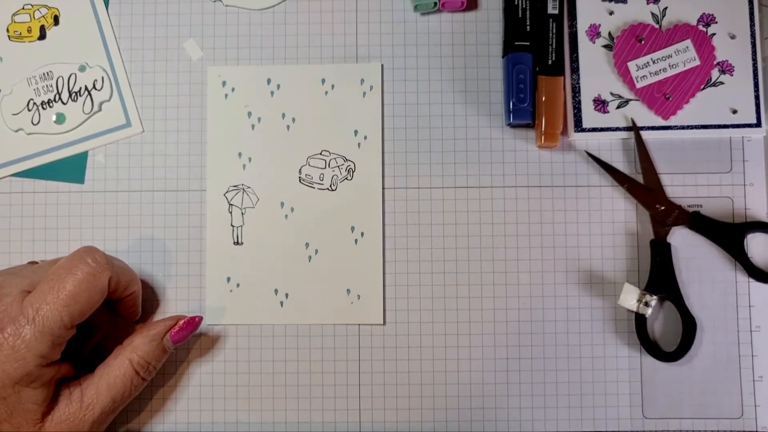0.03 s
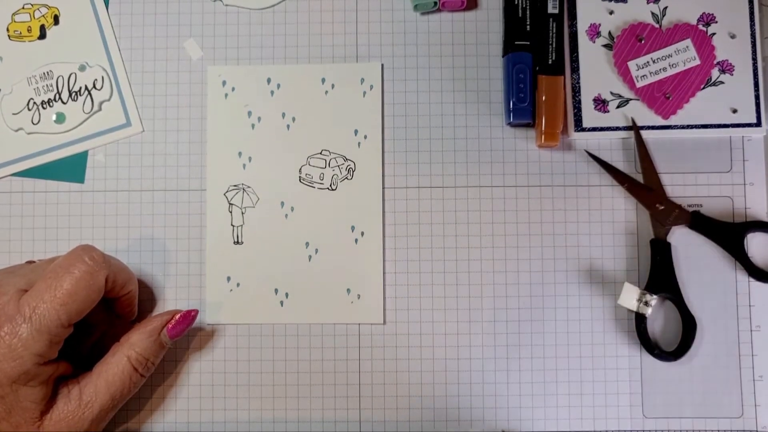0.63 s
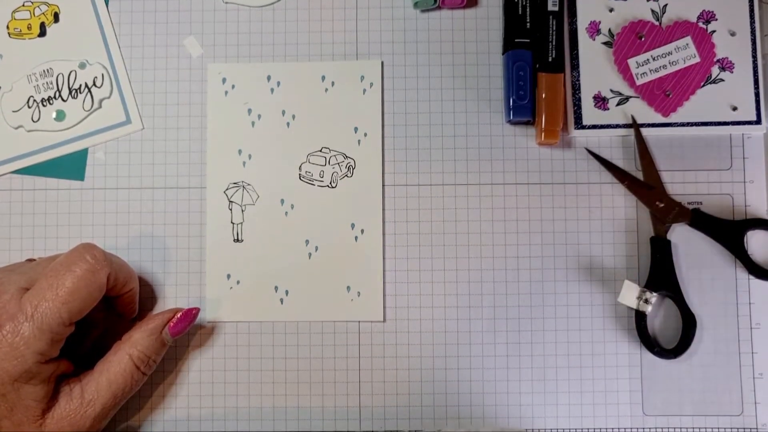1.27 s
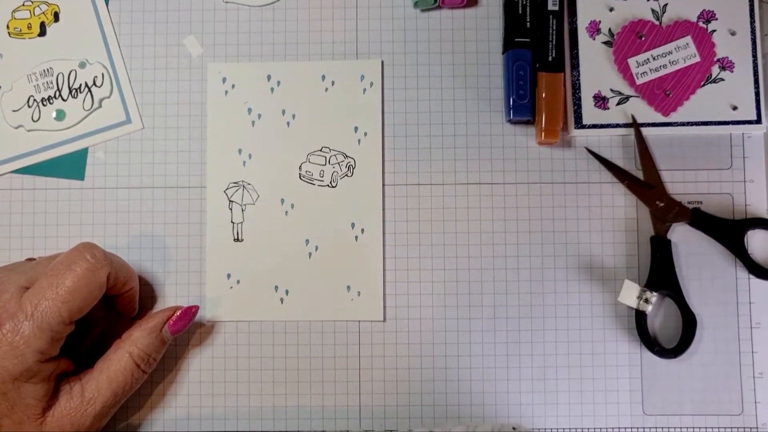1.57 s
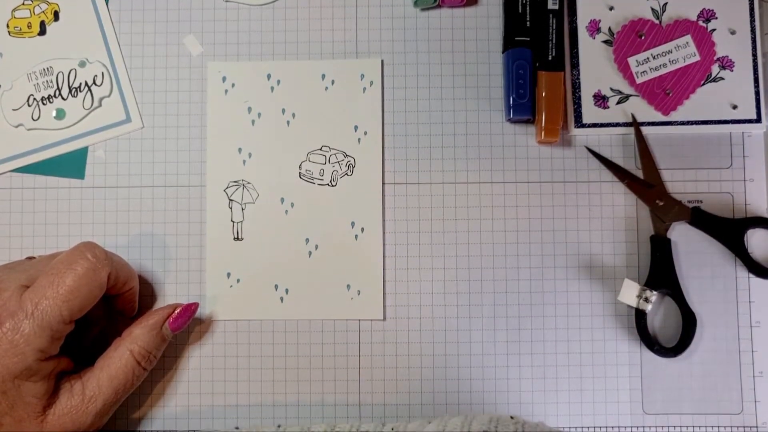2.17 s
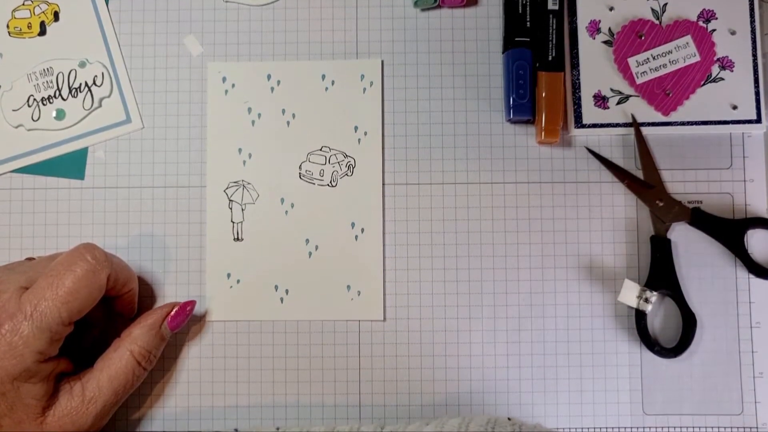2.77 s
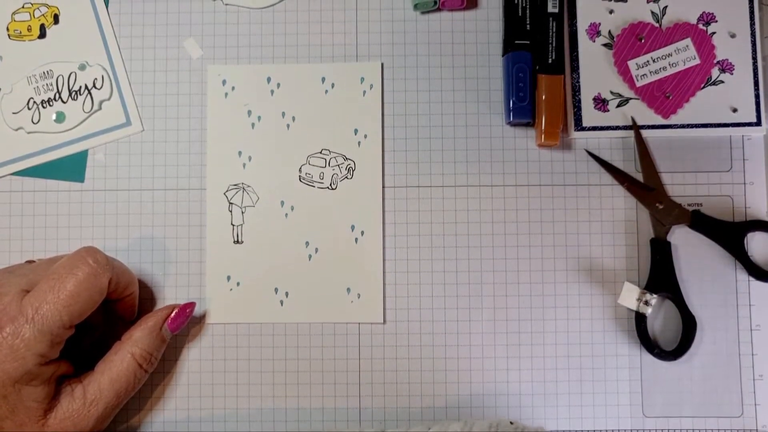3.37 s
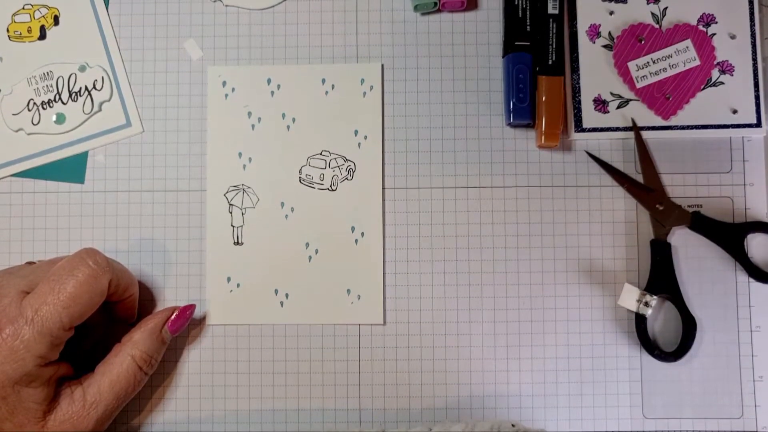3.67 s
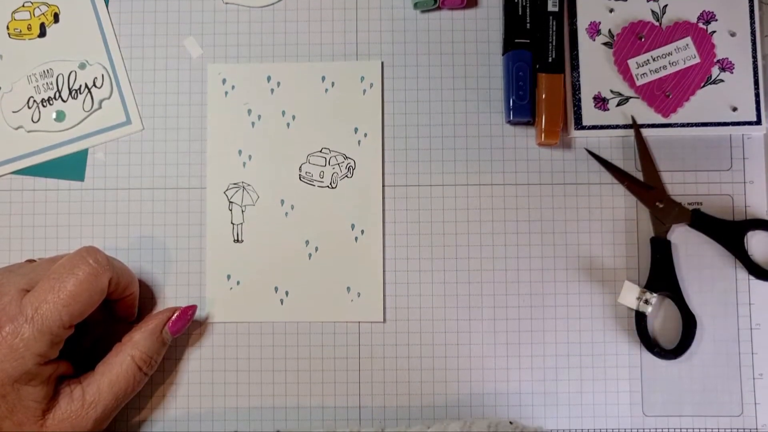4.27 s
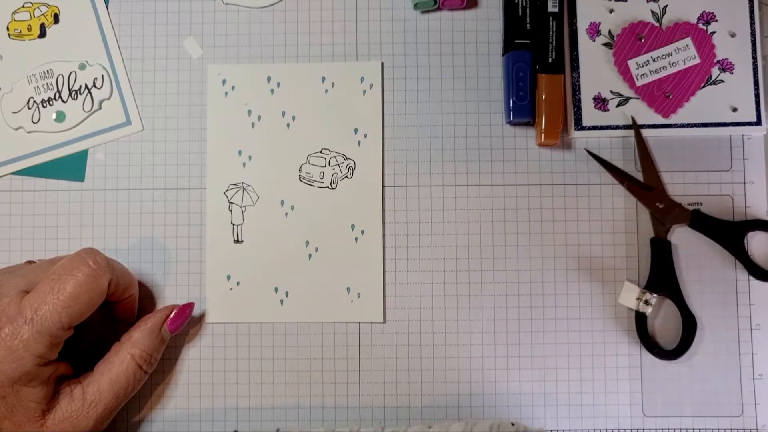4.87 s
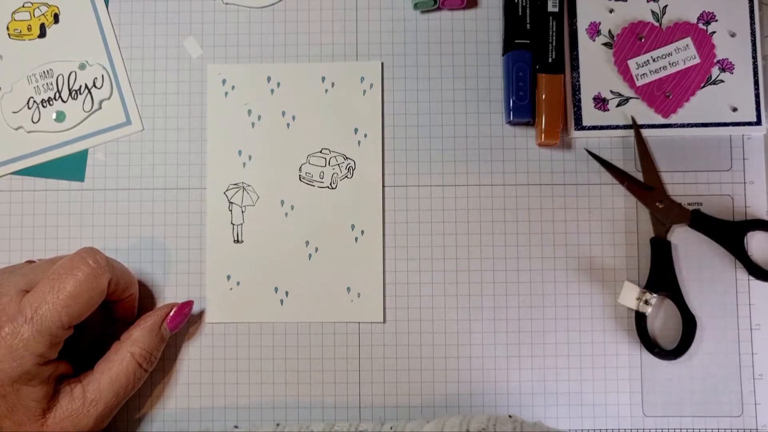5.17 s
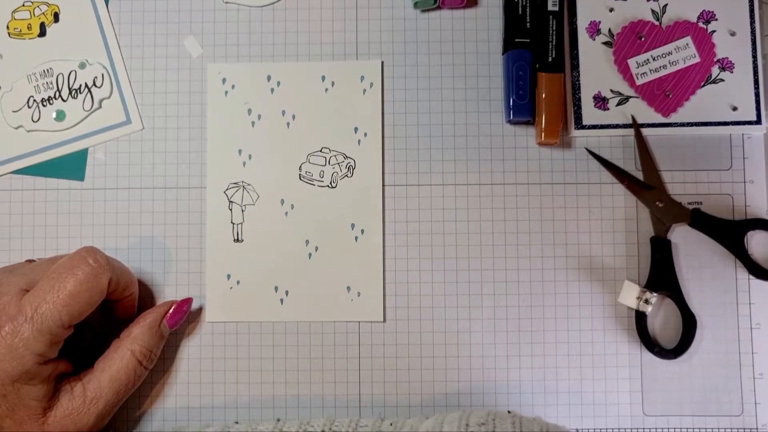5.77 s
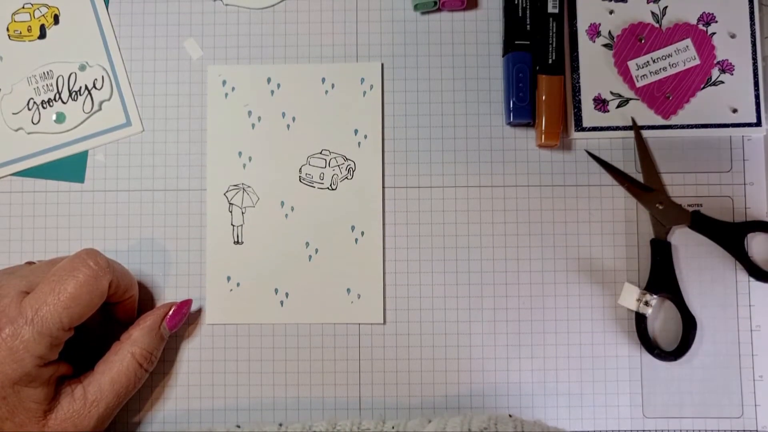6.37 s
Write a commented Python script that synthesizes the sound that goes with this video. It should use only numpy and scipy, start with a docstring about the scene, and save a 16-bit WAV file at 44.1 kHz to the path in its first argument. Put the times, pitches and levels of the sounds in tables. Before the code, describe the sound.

Plastic markers tap and scrape lightly against each other, then clatter more busily as they are pushed around, with dull bumps on the desk. A pen drops with a small double clink and a few knocks follow. The handling stops for nearly a second, then resumes. The sound sits a little to the right in stereo, in a quiet, dry room with a faint rumble.

```python
"""Plastic marker pens are rummaged through at a desk in a small, dry room.
Light taps and scrapes build to a clatter of hollow barrels and caps, with soft thumps on the desk.
At 3.9 s a pen lands and bounces. After a pause of nearly a second, the pens knock and slide again
from 5.3 s. Throughout, two microphone ports a hand's width apart hear them from the right,
over a low room rumble."""
import sys
import numpy as np
from scipy import signal
from scipy.fft import rfft, irfft, next_fast_len
from scipy.io import wavfile
from scipy.ndimage import uniform_filter1d

SR = 44100
rng = np.random.default_rng(int(sys.argv[2]) if len(sys.argv) > 2 else 0)


def transcribe(signal):
    """Save signal, clipped to [-1, 1], as a 16-bit WAV file at the path in sys.argv[1]."""
    frames = np.atleast_2d(signal).T
    limited = np.clip(frames, -1, 1)
    pcm = np.round(limited * 32767).astype(np.int16)
    wavfile.write(sys.argv[1], SR, pcm)


N = 287091
HIT_SAMPLES = 8192

# barrel and cap modes: freq_hz, width_hz, gain_db
PEN_MODES = [(480, 22.07, 3), (541, 58, 8), (597.5, 14, 2), (759.4, 26, 6), (1115, 200, 4), (1168, 37, -5),
             (1290, 30, 4.5), (1455, 120, 7.5), (1730, 170, -2.5), (1900, 150, 3), (2170, 450, -4),
             (2590, 70, 1.5), (3060, 120, 2.5), (3373, 96, 1), (3706, 230, -4), (4166, 160, 1),
             (4620, 200, -2), (5200, 620, -13), (6060, 330, -9), (6020, 56, -10.5), (7950, 910, -33),
             (9100, 270, -27.5), (10800, 2200, -29.5), (12700, 1400, -41.5)]
# pen on pen: start_s, level_db, hollow_db, hardness_db_per_octave, ring_hz
KNOCKS = [(0.241, -44, -11.5, 11, 4780), (0.301, -47, -4, 12, 3220), (0.322, -57, -2, 8, 4400),
          (0.364, -46.5, 2, 14, 2690), (0.562, -57, -4, 13.5, 2550), (0.617, -61, -2, -2, 1420),
          (0.755, -44, -4, -40, 1180), (0.78, -43.5, 35, 7, 1260), (0.835, -39.5, 3.5, -3.5, 1930),
          (0.886, -36, -2, -2, 1420), (0.919, -41, -13, -3, 1120), (0.98, -33, 3.5, -4.5, 1110),
          (1.087, -51, -15, -36, 810), (1.182, -42, -12, -11, 1560), (1.261, -53.5, 0, -30, 765),
          (1.339, -46.5, 14.5, -1, 760), (1.442, -32, -1, -2, 1035), (1.578, -48, -10, -3.5, 1410),
          (1.635, -42, 0, -11, 1370), (1.696, -35, -5.5, -3.5, 1040), (1.762, -45, 0, -0.5, 740),
          (1.789, -49, 7.5, -9, 1100), (1.926, -54, 19.5, 8, 1100), (2.062, -54, -22, -16, 1690),
          (2.243, -38, -5.5, 0.5, 1860), (2.34, -31.5, 4.5, 3.5, 1570), (2.357, -33.5, 5, 7.5, 1120),
          (2.434, -39, 16, -10.5, 1180), (2.476, -46.5, 12, 9, 1520), (2.543, -34.5, 15, -0.5, 1410),
          (2.617, -42.5, -11, -7, 1700), (2.636, -30, 3, -0.5, 1916), (2.701, -35, -17, -1, 2296),
          (2.723, -35, 2, 2, 1230), (2.823, -36.5, -1.5, -3, 2530), (2.858, -40, 8, -2, 1310),
          (2.913, -37.5, -16, -1.5, 1640), (2.956, -41, 5, -7, 1570), (3.11, -31, -21.5, -2, 2950),
          (3.138, -26.5, -8, -1.5, 1184), (3.244, -49, -9, -10.5, 740), (3.395, -38, 8, -1, 1496),
          (3.411, -35.5, -25, -5, 1740), (3.436, -37, 3, -3, 1740), (3.514, -40.5, 7.5, -4.5, 1890),
          (3.573, -40.5, -1, 0, 2900), (3.589, -32, -1.5, -0.5, 3600), (3.804, -46, 1.5, -4, 1490),
          (3.822, -47.5, 4, -4.5, 4400), (4.102, -63, -13, 2, 1700), (4.213, -36, 9.5, -0.5, 1230),
          (4.287, -33.5, 2.5, -2, 1066), (4.403, -44, 19, -2.5, 1384), (5.309, -50.5, -9, -6.5, 1166),
          (5.348, -44, -9, -10, 1208), (5.462, -44.5, 10, -3.5, 1400), (5.592, -47, 5.5, -23, 1180),
          (5.666, -43.5, 13.5, -4, 1700), (5.703, -44, 0, -42, 1290), (5.746, -41.5, -22, -55, 1290),
          (5.796, -34.5, -2, 3, 1110), (5.822, -36.5, 3, 7, 1910), (5.948, -52, 6, -1, 1170),
          (6.01, -55, -6, -22, 1350), (6.219, -54, 37, 15, 984), (6.336, -42, 12.5, -3.5, 1698),
          (6.373, -47, -4, -4, 2030), (6.396, -38.5, -16, -3, 1720), (6.444, -36.5, 10.5, -3.5, 2040),
          (6.491, -36.5, 11, 6.5, 1480)]


def knocks(rows, gain_db=0.5, ring_db=6.5, ring_width_hz=150, spread_db=5.5, detune=0.021):
    """No two pens are alike: each knock strikes the modes with its own strengths and tunings."""
    out = np.zeros((2, N))
    hollow_hz, shell_hz, cap_hz, finger_damping_hz = 620, 1000, 2000, 12
    hz, width_hz, mode_db = np.transpose(PEN_MODES)
    width_hz = width_hz * np.where(hz > cap_hz, 0.75, 1) + finger_damping_hz   # caps ring more freely
    for start_s, level_db, hollow_db, hardness, ring_hz in rows:
        barrel_db = at_hz([(hollow_hz, hollow_db), (shell_hz, 0)], hz)
        cap_db = hardness * np.clip(np.log2(hz / cap_hz), 0, 2.2)
        strength_db = mode_db + barrel_db + cap_db + spread_db * rng.standard_normal(len(hz))
        tuned_hz = hz * (1 + detune * rng.standard_normal(len(hz)))
        modes = list(zip(tuned_hz, width_hz, strength_db))
        alone_db = np.clip(1.8 * (-42.5 - level_db), 0, 5)   # a light tap favours one pen
        modes.append((ring_hz, ring_width_hz, ring_db + alone_db + np.interp(ring_hz, hz, strength_db)))
        softness = max(-hardness, 0) / 10 / cap_hz
        # thin barrels radiate no bass; a soft touch loses its top
        strike(out, start_s, level_db + gain_db,
               lambda f: body(modes, f) * edge(f, 260, "high") / (1 + 1j * f * softness))
    return out


# desk under the hands: freq_hz, width_hz, gain_db
DESK_MODES = [(50.3, 10, -3.5), (73.6, 11, 8.5), (119, 77, 4), (246.8, 60, 1.5), (308, 14, 12.5)]
# plastic-on-plastic hiss: freq_hz, density_db
HISS_SPECTRUM = [(900, -15.5), (2600, -1), (6500, -3), (8500, -8), (11500, -7), (14500, -16)]
# hand pushing the pens: start_s, length_s, scrape_db, hiss_db
PUSHES = [(0.182, 0.036, -53.5, -47.5), (0.226, 0.22, -66.5, -60.5), (0.473, 0.16, -79, -72),
          (0.732, 0.13, -56.5, -63), (1.006, 0.39, -68, -65), (1.577, 0.19, -65.5, -68),
          (2.2, 0.047, -53.5, -65.5), (2.359, 0.093, -48, -57), (2.552, 0.027, -55, -64),
          (2.677, 0.092, -50, -55), (2.833, 0.36, -51.5, -59.5), (3.113, 0.32, -73, -100),
          (3.373, 0.098, -54.5, -58), (3.5, 0.13, -58, -70), (3.729, 0.057, -66, -68.5),
          (3.852, 0.044, -53.5, -77), (4.184, 0.18, -63, -61), (5.289, 0.052, -52.5, -66),
          (5.416, 0.049, -54.5, -70), (5.529, 0.14, -57.5, -98), (5.65, 0.19, -54.5, -73),
          (5.822, 0.92, -66, -72), (6.33, 0.2, -51, -59)]


def sliding(rumble_db=-8.5):
    """Friction drives the pens' modes, hisses and shakes the desk."""
    scrape_envelope = sum(from_db(db) * stroke(start_s, length_s) for start_s, length_s, db, _ in PUSHES)
    hiss_envelope = sum(from_db(db) * stroke(start_s, length_s) for start_s, length_s, _, db in PUSHES)
    scrape = noise(lambda f: body(PEN_MODES, f) * edge(f, 260, "high") * edge(f, 2100, "low"),
                   grain=slips(per_s=570, smooth=0.41))
    hiss = noise(lambda f: from_db(at_hz(HISS_SPECTRUM, f)) * edge(f, 970, "high"),
                 grain=slips(per_s=2100, smooth=0.45))
    rumble = noise(lambda f: body(DESK_MODES, f) * edge(f, 270, "low"))
    return scrape_envelope * (scrape + from_db(rumble_db) * rumble) + hiss_envelope * hiss


def jostles(per_s=14, max_taps=12, above_scrape_db=1.5, spread_db=3, low_hz=1010, high_hz=2400):
    """Pushed pens tap at random, louder under a harder scrape."""
    hollow_db, hardness_db_per_octave = 0.5, -1.5
    rows = []
    for start_s, length_s, scrape_db, _ in PUSHES:
        delays_s = np.cumsum(rng.exponential(1, max_taps)) / per_s
        levels_db = scrape_db + above_scrape_db + spread_db * rng.standard_normal(max_taps)
        rings_hz = low_hz * (high_hz / low_hz) ** rng.random(max_taps)
        for delay_s, level_db, ring_hz in zip(delays_s, levels_db, rings_hz):
            if delay_s < min(length_s, N / SR - start_s):
                rows.append((start_s + delay_s, level_db, hollow_db, hardness_db_per_octave, ring_hz))
    return knocks(rows)


# landing pen: freq_hz, width_hz, gain_db
CLINK_MODES = [(1547, 82, 1.5), (1770, 310, 0), (2535, 120, -3.5), (2700, 74, -34), (4870, 900, -17)]
# landing and bounce: start_s, level_db
CLINKS = [(3.9051, -40), (3.923, -38.5)]


def clinks():
    """A pen rings in a few clear modes as it lands on the desk and bounces."""
    out = np.zeros((2, N))
    for start_s, level_db in CLINKS:
        strike(out, start_s, level_db, lambda f: body(CLINK_MODES, f) * edge(f, 3300, "low", order=2))
    return out


# soft bumps on the desk: start_s, level_db, boom_hz
THUMPS = [(0.269, -48, 117), (0.305, -51.5, 109), (2.089, -62, 134), (2.858, -45.5, 243),
          (2.912, -42.5, 219), (2.955, -46, 210.8), (3.01, -51.5, 240), (3.039, -47.5, 223),
          (3.065, -53.5, 119), (3.925, -52, 247), (5.35, -52.5, 129.3), (5.53, -50.5, 516),
          (5.704, -47.5, 114), (5.744, -47, 251), (6.149, -55.5, 515), (6.469, -49, 113.9)]


def thumps(boom_width_hz=45, panel_hz=320, panel_db=-9):
    """The desk top booms at a pitch set by where it is bumped, along with two fixed modes."""
    out = np.zeros((2, N))
    for start_s, level_db, boom_hz in THUMPS:
        modes = [(boom_hz, boom_width_hz, 0), (panel_hz, 70, panel_db), (480, 90, -10)]
        strike(out, start_s, level_db,
               lambda f: body(modes, f) * edge(f, 600, "low") * edge(f, 33, "high"))
    return out


# air in a sliding barrel: freq_hz, width_hz, gain_db
AIR_MODES = [(1440, 400, 11), (1790, 630, 2.5), (2870, 160, 4.5), (3940, 380, 2.5), (4600, 850, -23),
             (6450, 1900, -0.5)]
# barrel drawn along: start_s, length_s, level_db
DRAWS = [(0, 0.22, -67), (0.204, 0.43, -72), (5.675, 1, -69)]


def singing_barrels():
    """The air in a hollow barrel resonates faintly as it is drawn along."""
    envelope = sum(from_db(db) * stroke(start_s, length_s) for start_s, length_s, db in DRAWS)
    air = noise(lambda f: sum(from_db(db) * abs(resonance(f, hz, width_hz)) ** 2
                              for hz, width_hz, db in AIR_MODES))
    return envelope * air


# room rumble and microphone hiss: freq_hz, density_db
FLOOR_SPECTRUM = [(12, -32), (20, -13.5), (43, -15), (59, -12), (80, -17.5), (124, -8.5), (147, -25),
                  (242, -25.5), (713, -37.5), (4950, -43), (6010, -37), (7300, -34.5), (8380, -54.5),
                  (13100, -41), (15000, -52)]


def background(floor_db=-69.5, hum_db=-70.5, hum_hz=72.4, hum_width_hz=4):
    """Low room rumble, a wavering hum and faint microphone hiss."""
    hum = noise(lambda f: resonance(f, hum_hz, hum_width_hz) ** 2)
    floor = noise(lambda f: from_db(at_hz(FLOOR_SPECTRUM, f)))
    return from_db(floor_db) * floor + from_db(hum_db) * hum


def strike(out, start_s, level_db, response, lead_samples=256, attack_samples=660):
    """Add one contact ringing through response(f); level_db sets the rms of its attack."""
    f = np.fft.rfftfreq(HIT_SAMPLES, 1 / SR)
    hit = irfft(whiten(contact(f, level_db)) * response(f))
    hit = np.roll(hit, lead_samples, axis=1)   # keeps the soft foot of the attack
    gain = from_db(level_db) / rms(hit[:, lead_samples:lead_samples + attack_samples])
    first = int(start_s * SR) - lead_samples
    out[:, first:first + HIT_SAMPLES] += gain * hit[:, :N - first]


def contact(f, level_db, give_s=0.00077, near_t60_s=0.042, room_t60_s=0.14, near_db=5, room_db=3.5):
    """Stereo spectra of a touch: click and chatter, reflections off things on the desk, then the room."""
    t = np.arange(HIT_SAMPLES) / SR
    chatter_t60_s = 0.017 * 2 ** ((level_db + 45.5) / 22)   # harder knocks chatter longer
    chatter = rng.standard_normal(HIT_SAMPLES) * impulses(HIT_SAMPLES, per_s=1800)
    chatter *= burst(t, give_s, chatter_t60_s)   # plastic gives before it grips
    chatter[0] = 1.0   # the click
    near = burst(t, rise_s=0.00017, t60_s=near_t60_s) * impulses(HIT_SAMPLES, per_s=2500)
    room = burst(t, rise_s=0.0033, t60_s=room_t60_s)
    echoes = np.hypot(from_db(near_db) * near / np.linalg.norm(near),
                      from_db(room_db) * room / np.linalg.norm(room))
    return rfft(chatter / np.linalg.norm(chatter)) * from_right(f) + diffuse(echoes)


def whiten(spectra, bins=61):
    """A brief contact is flat across broad bands; only the fine ripple of its echoes stays."""
    power = uniform_filter1d(np.mean(abs(spectra) ** 2, axis=0), bins)
    return spectra / np.sqrt(uniform_filter1d(power, bins))


def stroke(start_s, length_s, grip_s=0.013, release_db_per_s=327.5):
    """Envelope of one hand movement: grip, hold, release."""
    envelope, first = np.zeros(N), int(start_s * SR)
    t = np.arange(min(N - first, int((length_s + 0.5) * SR))) / SR
    fade_db = release_db_per_s * np.maximum(t - length_s, 0)
    envelope[first:first + len(t)] = np.minimum(t / grip_s, 1) ** 2 * from_db(-fade_db)
    return envelope


def slips(per_s, smooth, size_db=3):
    """Stick and slip: tiny uneven jerks on top of smooth friction."""
    return smooth + impulses(N, per_s) * from_db(size_db * np.minimum(rng.exponential(1, N), 4))


def noise(response, grain=1):
    """Diffuse stereo noise, modulated by grain, through response(f); rms 1."""
    size = 2 * next_fast_len(N // 2 + 1)
    f = np.fft.rfftfreq(size, 1 / SR)
    envelope = np.resize(grain * np.ones(N), size)
    shaped = irfft(diffuse(envelope) * response(f))[:, :N]
    return shaped / rms(shaped)


def diffuse(envelope, port_spacing_m=0.13):
    """Spectra of noise from all sides: the two ports agree only on long waves."""
    f = np.fft.rfftfreq(len(envelope), 1 / SR)
    mid, side = rfft(rng.standard_normal((2, len(envelope))) * envelope)
    coherence = 0.85 * np.sinc(2 * f * port_spacing_m / 343)
    return np.sqrt((1 + coherence) / 2) * mid + np.sqrt((1 - coherence) / 2) * side * [[1], [-1]]


def from_right(f, left_lag_s=0.000338):
    """Sound from the right reaches the left port late."""
    return np.exp(-2j * np.pi * f * [[left_lag_s], [0]])


def body(modes, f):
    """All modes of an object driven together."""
    return sum(from_db(db) * resonance(f, hz, width_hz) for hz, width_hz, db in modes)


def resonance(f, hz, width_hz):
    """One damped mode, peak gain 1."""
    return 1j * f * width_hz / (hz ** 2 - f ** 2 + 1j * f * width_hz)


def edge(f, hz, kind, order=3):
    """Causal high- or low-pass response."""
    return signal.freqs(*signal.butter(order, hz, kind, analog=True), worN=f)[1]


def at_hz(points, hz):
    """Spectrum in dB, interpolated over log frequency."""
    f, db = np.transpose(points)
    return np.interp(np.log(np.maximum(hz, 1)), np.log(f), db)


def burst(t, rise_s, t60_s):
    return (1 - np.exp(-t / rise_s)) * from_db(-60 * t / t60_s)


def impulses(samples, per_s):
    return rng.random(samples) < per_s / SR


def from_db(db):
    return 10 ** (np.asarray(db) / 20)


def rms(x):
    return np.sqrt(np.mean(x ** 2) + 1e-24)


def scene(right_db=0.5):
    """Pens a little to the right in a quiet room."""
    mix = background() + sliding() + singing_barrels() + clinks() + thumps() + knocks(KNOCKS) + jostles()
    return mix * from_db([[-right_db], [right_db]])


def record(dry, cutoff_hz=14700):
    """Steep low-pass."""
    return signal.sosfilt(signal.ellip(10, 0.2, 70, cutoff_hz, fs=SR, output="sos"), dry)


dry = scene()
out = record(dry)
transcribe(out)
```